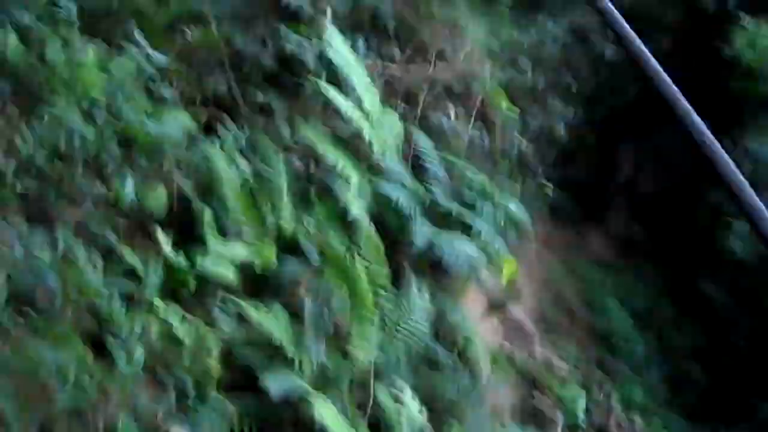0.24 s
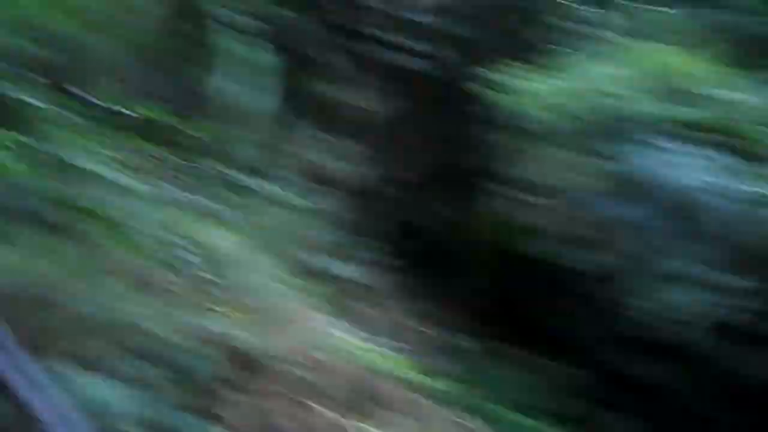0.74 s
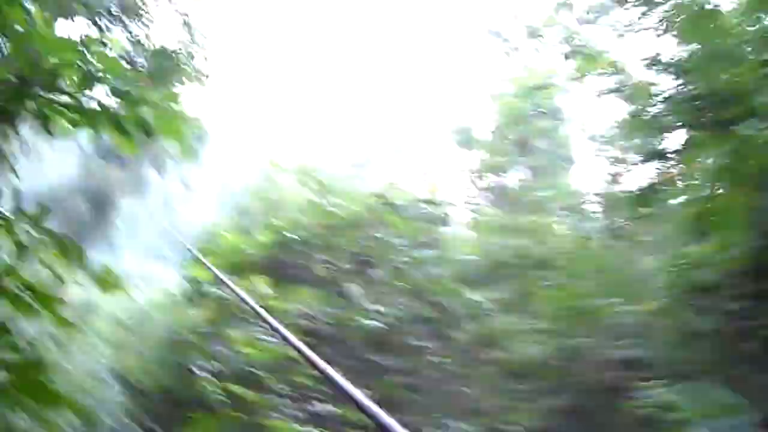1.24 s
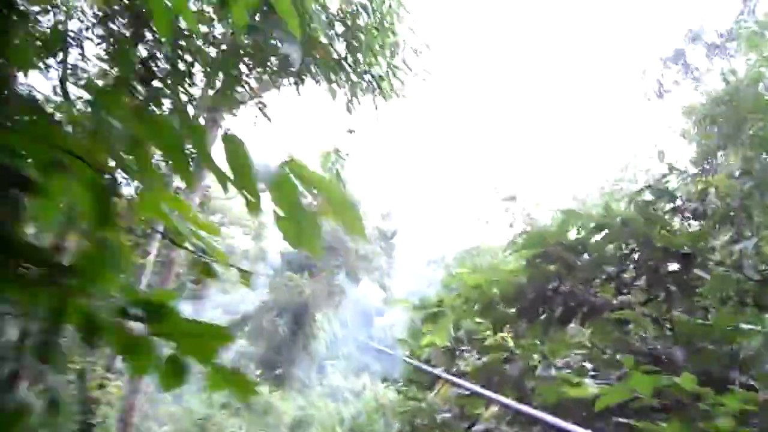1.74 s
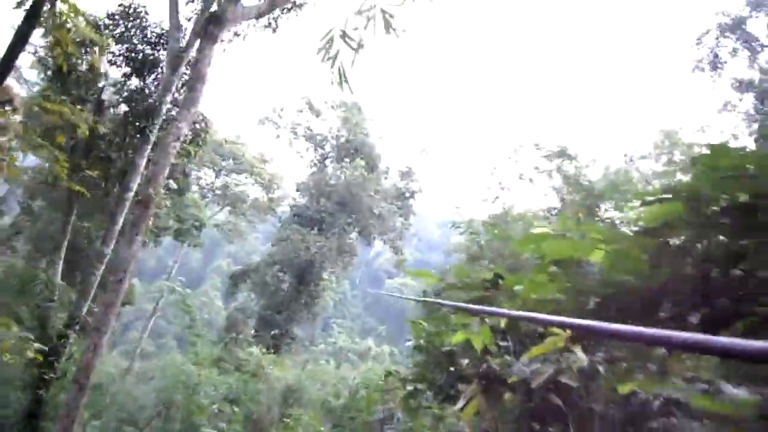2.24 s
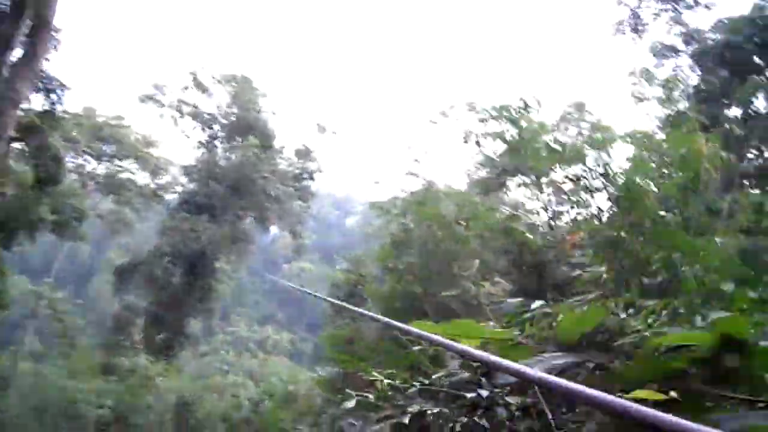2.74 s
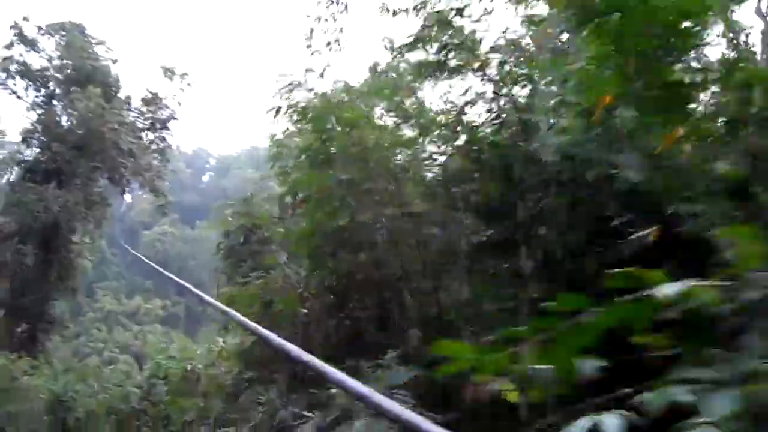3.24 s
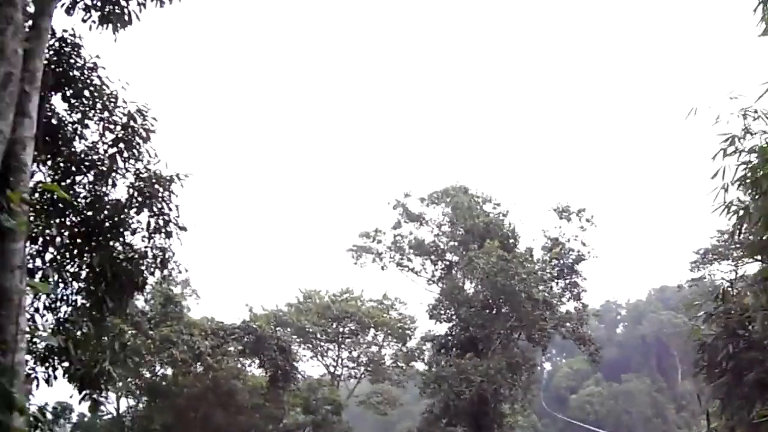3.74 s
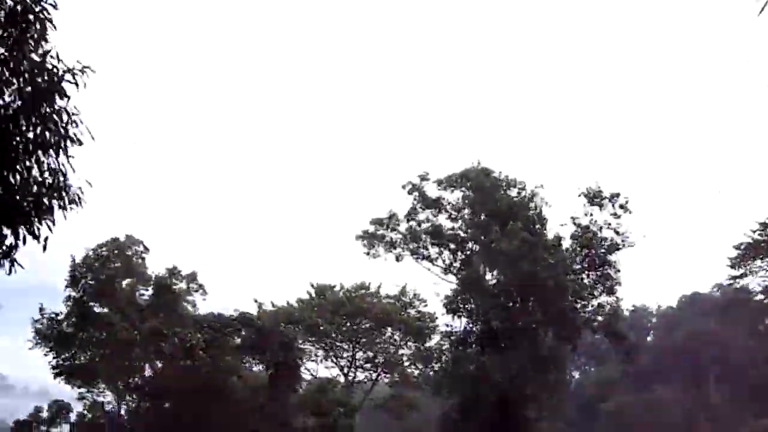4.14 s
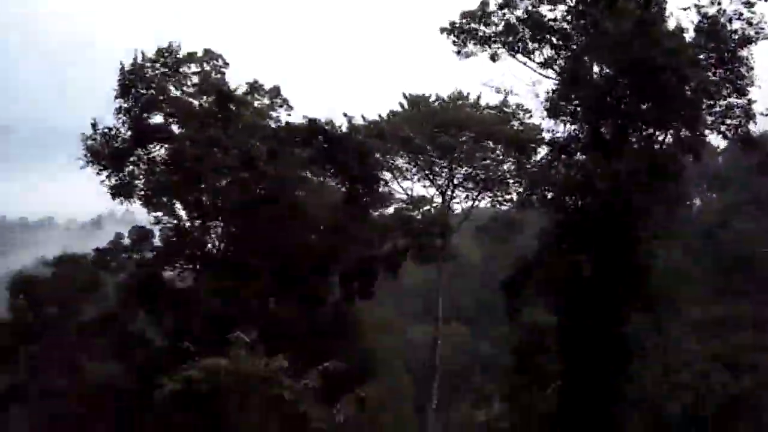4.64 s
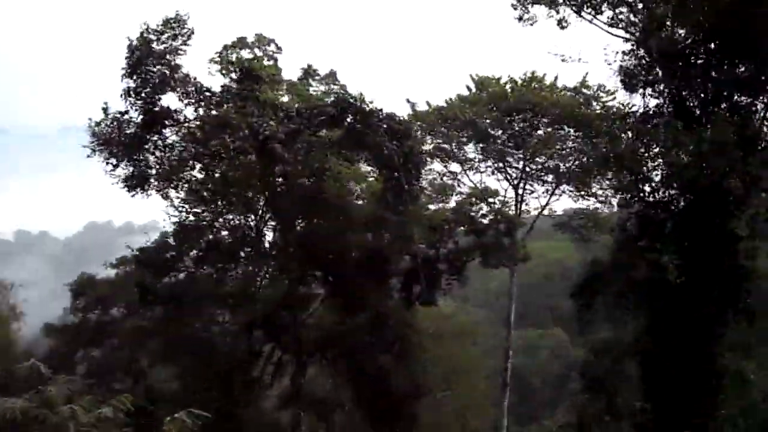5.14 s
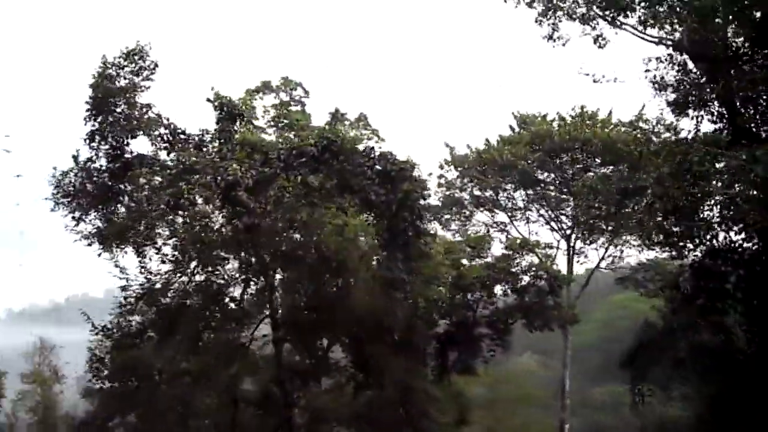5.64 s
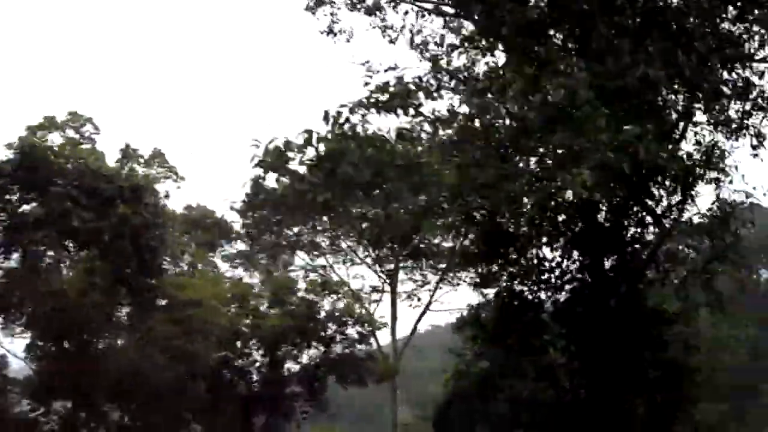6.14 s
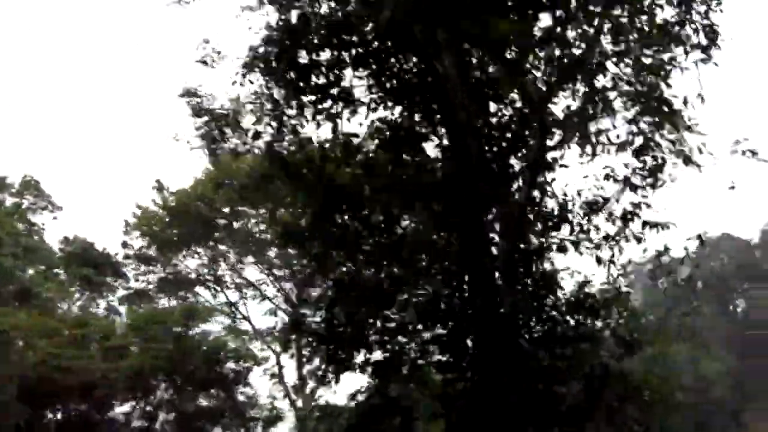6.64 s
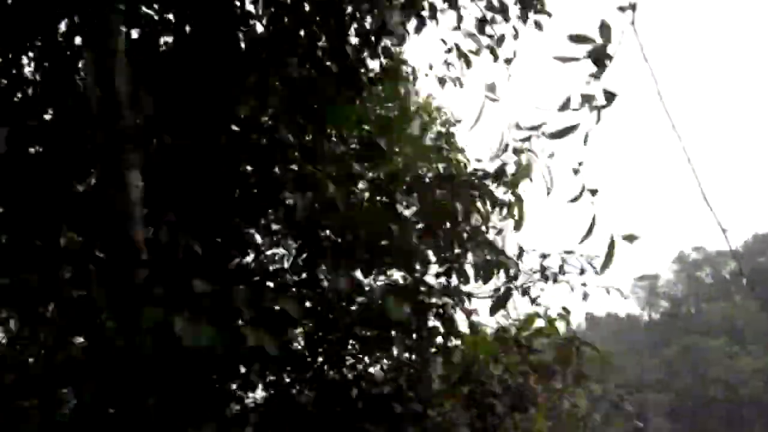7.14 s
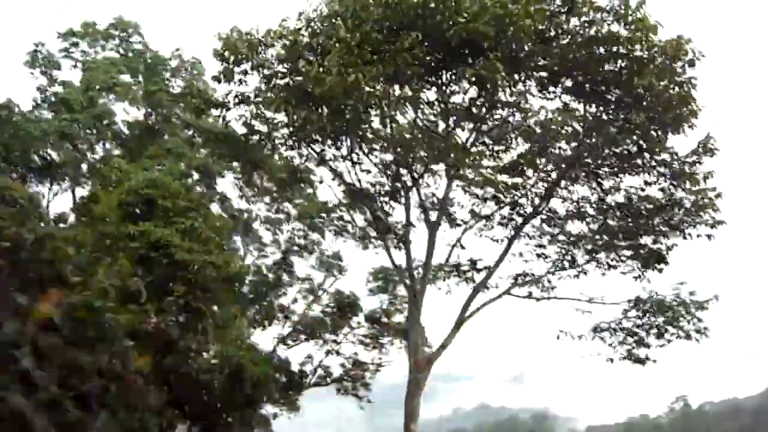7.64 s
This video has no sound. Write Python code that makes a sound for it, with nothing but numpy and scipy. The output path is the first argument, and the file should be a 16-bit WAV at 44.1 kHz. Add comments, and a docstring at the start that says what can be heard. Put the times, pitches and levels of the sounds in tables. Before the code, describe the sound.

A steady metallic whirring hiss from a zip line trolley builds and climbs in pitch, with wind rumble and one sharp slap near the end.

```python
"""Trolley on a steel cable.

Pulleys gather speed above a camera that turns in the rider's hand. Groove bumps repeat every turn,
strands whine 12 times a turn, grit hisses in the trolley's resonances. Gusts and a growing headwind
buffet each microphone port separately. Once something slaps the camera and the recorder clips."""
import sys
import numpy as np
from scipy import signal
from scipy.fft import rfft, irfft, next_fast_len
from scipy.io import wavfile
from scipy.ndimage import uniform_filter1d, map_coordinates

SR = 44100
rng = np.random.default_rng(int(sys.argv[2]) if len(sys.argv) > 2 else 0)


def store_pcm(level_fs):
    """Save levels as 16-bit WAV."""
    pcm = np.round(np.clip(level_fs, -1, 1) * 32767).astype(np.int16)
    wavfile.write(sys.argv[1], SR, np.atleast_2d(pcm).T)


N = 348390
TIME_S = np.arange(N) / SR
CRUISE_TURNS_PER_S = 70
SLAP_S, PUFF_S = 7.3795, 7.389
# Each row: time in s, pulley turns per s, strand whine in dB, share of power repeating each turn.
PULLEY_RUN = [(0, 32, -70, 0.1), (.9, 46, -60, 0.15), (1.0, 45, -47, 0), (1.2, 58, -42, 0.4),
              (1.5, 60, -46, 0.22), (2, 62, -40, 0.33), (2.4, 65.5, -48, 0.23), (3, 68, -52, 0.28),
              (3.7, 76, -49, 0.46), (4.2, 80, -48, 0.4), (4.6, 82, -58, 0.62), (5, 87.4, -45, 0.78),
              (5.5, 93, -45.5, 0.44), (6, 98, -43, 0.61), (6.5, 104, -40.5, 0.65), (7, 106, -36.5, 0.54),
              (7.5, 112, -37, 0.42), (7.9, 109.6, -48, 0.4)]


def amp(db):
    """dB to gain."""
    return 10 ** (np.asarray(db) / 20)


def unit(x):
    """Scale to rms 1."""
    return x / np.sqrt(np.mean(x ** 2) + 1e-20)


def along(points, at):
    """Interpolate (x, value) points on a log x axis."""
    x, value = np.transpose(points)
    return np.interp(np.log(at + 1e-3), np.log(x), value)


def curves(rows, t=TIME_S):
    """Each column after the time, read at times t."""
    times, *columns = np.transpose(rows)
    return [np.interp(t, times, column) for column in columns]


def wobble(knots_per_s):
    """Smooth random curve."""
    knots = rng.standard_normal(int(N * knots_per_s / SR) + 4)
    return map_coordinates(knots, [TIME_S * knots_per_s])


def swell(t, middle_s, half_s, steepness=2.27):
    """Rounded rise and fall, 1 at the middle."""
    return np.exp(-np.abs((t - middle_s) / half_s) ** steepness)


def filtered(x, response):
    """Apply a gain given as a function of Hz."""
    size = next_fast_len(N + 8192)
    return irfft(rfft(x, size) * response(np.fft.rfftfreq(size, 1 / SR)), size)[..., :N]


def resonance(hz, centre_hz, width_hz, db):
    """Power of a resonance applied twice, averaging db over frequency."""
    centre_hz = centre_hz + np.zeros_like(db)
    detuning = (hz ** 2 - centre_hz ** 2) / (hz + 1) / width_hz
    shape = 1 / (1 + detuning ** 2) ** 2
    return amp(db) ** 2 * shape / shape.mean(axis=0)


def headwind(cruise_db=-44, db_per_octave=13.5, top_hz=80):
    """Deep rumble that grows with speed, independent at each port."""
    speed_db = db_per_octave * np.log2(curves(PULLEY_RUN)[0] / CRUISE_TURNS_PER_S)
    deep = filtered(rng.standard_normal((2, N)), lambda hz: hz / (hz + 20) / (1 + (hz / top_hz) ** 3))
    return amp(cruise_db + speed_db + 1.2 * wobble(3.1)) * unit(deep)


def wind():
    """Eddies burst on each port: lumpy thud and roar, gusts over a steady breeze."""
    # Eddy spectra. Each row: frequency in Hz, relative level in dB.
    thud_spectrum = [(15, -18), (40, -14.5), (110, -2), (220, -2.5), (350, -7), (700, -19), (1500, -56)]
    roar_spectrum = [(100, -41), (250, -2.5), (450, 0), (750, -1), (1600, -11), (2500, -13), (5000, -52)]
    # Per port: thud in dB, roar in dB.
    breeze = {"L": (-41, -43.5), "R": (-35.5, -37.5)}
    # Each row: port, middle in s, half length in s, thud in dB, roar in dB.
    gusts = [("R", 0.089, 0.053, -24, -23.5), ("L", .21, 0.035, -34, -30.5), ("R", 0.23, 0.062, -43, -33),
             ("L", .33, 0.045, -40, -35.5), ("R", 0.443, 0.01, -25, -24), ("R", 0.512, 0.021, -17.5, -18.5),
             ("R", 0.554, 0.029, -20, -11.5), ("L", 0.67, .05, -37, -38), ("L", .77, 0.031, -34, -23.5),
             ("L", 0.825, .04, -31, -32), ("R", 0.907, 0.077, -35, -26), ("R", 2.086, 0.35, -25, -15.5),
             ("L", 2.3, 0.32, -37, -30.5), ("R", 2.33, 0.072, -20.5, -18), ("R", 2.55, 0.17, -23.5, -14),
             ("L", 2.77, .2, -37, -30.5), ("R", 3.16, 0.22, -25.5, -21), ("R", 3.43, 0.11, -30, -15.5),
             ("L", 3.43, 0.12, -35, -40), ("R", 3.94, 0.23, -21.5, -14), ("R", 4.15, 0.1, -30, -11.5),
             ("R", 4.363, 0.16, -21.5, -13), ("L", 4.65, 0.12, -39, -32), ("R", 4.66, 0.11, -24.5, -25.5),
             ("R", 4.9, 0.13, -28, -24.5), ("R", 6.08, 0.32, -28.5, -40), ("L", 6.13, .2, -29.5, -36),
             ("L", 6.68, 0.31, -26, -39), ("R", 6.72, .35, -24.5, -36), ("L", 7.35, .12, -30, -38),
             ("R", 7.45, .15, -23.5, -34), ("L", 7.8, .25, -28.5, -37), ("R", 7.8, 0.2, -20.5, -29.5)]
    ports = []
    for port, steady_db in breeze.items():
        gust_power = sum(amp([[thud_db], [roar_db]]) ** 2 * swell(TIME_S, middle_s, half_s)
                         for side, middle_s, half_s, thud_db, roar_db in gusts if side == port)
        power = amp(steady_db)[:, None] ** 2 + gust_power
        lumps = 0.7 * wobble(24) + 1.74 * wobble(80)
        layers = []
        for spectrum, depth_db in ((thud_spectrum, .7), (roar_spectrum, 1.2)):
            eddies = filtered(rng.standard_normal(N), lambda hz: amp(along(spectrum, hz)))
            layers.append(unit(amp(lumps * depth_db) * eddies))
        ports.append(np.sum(np.sqrt(power) * layers, axis=0))
    return np.array(ports)


def slap(left_db=3, right_db=2, length_s=.005, puff_db=-4, puff_hz=150):
    """A broad crack on the camera, then one low swing of air on the left port."""
    age = (TIME_S - SLAP_S) / length_s
    envelope = (age > 0) * np.exp(-np.clip(age, 0, 9) ** 3)
    crack = filtered(rng.standard_normal((2, N)), lambda hz: 1 / (1 + (hz / 7000) ** 2))
    ports = unit(crack) * envelope * amp([[left_db], [right_db]])
    cycle = (TIME_S - PUFF_S) * puff_hz
    ports[0] -= amp(puff_db) * np.sin(2 * np.pi * cycle) * (cycle > 0) * (cycle < 1)
    return ports


def strand_whine(turns_per_s, db, strands_per_turn=12):
    """Cable strands pass under the pulley: a fluttering tone."""
    phase = 2 * np.pi * strands_per_turn * np.cumsum(turns_per_s) / SR
    return amp(db) * (wobble(25) * np.sin(phase) + wobble(25) * np.cos(phase))


def howl_and_squeals(hz, t, howl_width_hz=117):
    """Power spectrum of a narrow howl that climbs as speed grows, and of brief wheel squeals."""
    # Each row: time in s, pitch in Hz, dB over the rolling level.
    howl = [(1.12, 1256, -50), (1.16, 1280, -17), (1.35, 1420, -17.5), (1.5, 1578, -11.5),
            (1.7, 1460, -12.5), (2, 1590, -19), (2.25, 1790, -13.5), (2.5, 1905, -25), (2.75, 2100, -11.5),
            (3.2, 2096, -11), (3.45, 2500, -18), (3.65, 2404, -15), (3.76, 2320, -6), (4.3, 2408, -9),
            (4.7, 2464, -3.5), (5, 2545, -1), (5.3, 2490, -10.5), (5.5, 2546, -19), (5.6, 2832, -6.5),
            (6, 2640, -5), (6.3, 2540, -13), (7.9, 2500, -23)]
    # Each row: middle in s, half length in s, pitch in Hz, glide in Hz/s, width in Hz, dB over rolling.
    squeals = [(0.155, 0.077, 3400, 300, 300, 1.5), (.21, .05, 4950, 100, 500, -5),
               (0.446, .12, 2380, 300, 300, -9), (0.99, 0.12, 3750, 2700, 800, -3.5),
               (2.95, .3, 3720, 100, 350, -11), (4.1, 0.37, 3380, 150, 200, -8.5),
               (7.2, 0.32, 3130, 100, 199.9, -14)]
    howl_hz, howl_db = curves(howl, t)
    power = resonance(hz, howl_hz, howl_width_hz, howl_db)
    for middle_s, half_s, centre_hz, glide_hz_per_s, width_hz, db in squeals:
        pitch_hz = centre_hz + glide_hz_per_s * np.clip(t - middle_s, -half_s, half_s)
        power += resonance(hz, pitch_hz, width_hz, db) * swell(t, middle_s, half_s)
    return power


def side_plates(hz, t, turns_per_s, pan_db, low_hz=1574):
    """Power spectrum of the plates' three rings at one port: middle, upper, low."""
    # Each row: time in s, middle ring in Hz, then middle, upper and low ring in dB over rolling.
    rings = [(0, 2510, -6, -7, -19), (.15, 2400, -8.5, -10, -26), (.3, 2350, -4, -7.5, -27),
             (.6, 2670, -5.5, -7.5, -18), (.9, 2400, -11, -7.5, -11.5), (1.5, 2500, -9, -5.5, -20),
             (1.8, 2650, -6, -2.5, -15), (2.1, 2730, -4.5, -4, -13.5), (2.4, 2655, -5.5, -5, -13),
             (2.7, 2530, -3.5, -2, -16), (3.1, 2270, -7.5, -4, -23), (3.6, 2410, -5.5, -11.5, -30),
             (3.9, 2370, -7.5, -7, -23), (4.5, 2418, -3, -7, -27), (4.8, 2503, -9.5, -16, -37),
             (5.1, 2540, -8.5, -29, -27), (5.4, 2620, -9, -13, -24.5), (5.7, 2790, -9.5, -22, -25.5),
             (6, 2690, -2.5, -14, -24), (6.3, 2735, -6, -9.5, -19), (6.9, 2603, -6.5, -12, -17),
             (7.2, 2527, -15, -6.5, -17), (7.5, 2656, -7, -14, -20), (7.9, 2600, -8.5, -12, -22)]
    # Each row: turns per s, upper ring in Hz.
    upper_ring = [(84, 3332), (95, 2910)]
    # Per ring: width in Hz; weight of the pan.
    widths_hz = [900, 750, 870]
    pan_weights = [0.61, 1.4, .1]
    middle_hz, *levels_db = curves(rings, t)
    centres_hz = [middle_hz, along(upper_ring, turns_per_s), low_hz]
    return sum(resonance(hz, centre_hz, width_hz, db) * amp(weight * pan_db)
               for centre_hz, width_hz, db, weight in zip(centres_hz, widths_hz, levels_db, pan_weights))


def treble_rings(hz, t, turns_per_s, swings_db, port):
    """Power spectrum of the treble at one port: shifts with speed and camera angle, flares at jolts."""
    # Each row: centre in Hz, width in Hz.
    rings = [(4250, 1350), (5600, 2270), (7800, 2010), (10000, 1350)]
    # Per port, a row per ring: dB over rolling at cruise, dB per octave of speed, weights of 3 swings.
    pickup = [
        [(-13, 0.3, .01, 0.98, 0.029), (-10.5, 6.5, 0.24, -0.14, .05), (-17, 2, 0.85, -0.0067, -0.08),
         (-26, -5.5, 0.74, -0.056, 0.25)],
        [(-9, -1.5, -0.023, 0.12, .01), (-7, -1.5, -0.065, -0.21, 0.17), (-8.5, 7, -0.23, 0.29, 0.025),
         (-20, 1.5, -0.088, .01, 0.96)],
    ]
    # Each row: start in s, flare strength in dB.
    jolts = [(0, 6), (.755, 10.5), (.87, 2.5), (1.09, 3)]
    # Narrow steel ring. Each row: time in s, left and right in dB over rolling.
    sizzle = [(0, -25, -25), (1.2, -24, -18), (2, -15, -18), (2.8, -17, -15), (3.4, -12, -3),
              (3.7, -21, -11), (4.6, -14, -25), (4.9, -25, -28), (5.4, -24, -30), (5.65, -6, -19),
              (6.1, -12, -19), (6.8, -18, -19), (7.1, -18, -11), (7.9, -17, -17)]
    rise_s, fade_s = 0.0094, 0.055
    flare_db = sum(db * np.exp(-np.abs(t - start_s) / fade_s) * np.clip((t - start_s) / rise_s, 0, 1)
                   for start_s, db in jolts)
    octaves = np.log2(turns_per_s / CRUISE_TURNS_PER_S)
    levels_db = np.array(pickup[port]) @ [np.ones_like(t), octaves, *swings_db] + flare_db
    power = sum(resonance(hz, *ring, db) for ring, db in zip(rings, levels_db))
    power += resonance(hz, centre_hz=12800, width_hz=2500, db=levels_db[-1] - 6)
    return power + resonance(hz, centre_hz=5440, width_hz=500, db=curves(sizzle, t)[port])


def contact(turns_per_s, bumps=128, drift_per_s=7, grit_db=1.5):
    """Pulley-on-cable forces: groove bumps that return each turn, and two streams of random grit."""
    angle_turns = np.cumsum(turns_per_s) / SR % 1
    groove = rng.standard_normal((int(N * drift_per_s / SR) + 4, bumps))
    # The wheel wanders on the strands, so the pattern drifts.
    repeat = map_coordinates(groove, [TIME_S * drift_per_s, angle_turns * bumps], mode="grid-wrap")
    repeat = unit(repeat) * np.sqrt(bumps * turns_per_s / SR)  # same strength per Hz as the grit
    grit = unit(rng.standard_normal((2, N)) * amp(grit_db * wobble(400) + 0.6 * wobble(70)))
    return np.array([repeat, *grit])


def trolley(frame_samples=512, groove_harmonic=29, groove_width_hz=600):
    """Contact forces ring plates and sheaves; each port hears them at its own level and phase."""
    # Each row: time in s, rolling level in dB.
    rolling = [(0, -17.5), (.06, -23.5), (.12, -27), (.2, -21.5), (.3, -24.5), (.4, -22), (.5, -21),
               (.73, -21.5), (.78, -17.5), (1.05, -17.5), (1.12, -10), (1.3, -12), (1.6, -8.5),
               (1.8, -12.5), (2.1, -8.5), (2.4, -11), (2.7, -10.5), (3, -10.5), (3.2, -8.5), (3.5, -9),
               (3.65, -11.5), (3.8, -9.5), (4.1, -12), (4.8, -10), (5, -14.5), (5.2, -11), (5.42, -13),
               (5.65, -10.5), (6, -10.5), (6.1, -13), (6.4, -13), (6.5, -13), (6.65, -14), (6.8, -13),
               (7, -15), (7.1, -11.5), (7.2, -12.5), (7.4, -12), (7.6, -13.5), (7.7, -12), (7.8, -12),
               (7.9, -9.5)]
    # Each row: time in s, Hz near which the ports' phase flips, pan to the left in dB,
    # then swings in dB of the left high treble, left low treble and right top treble.
    camera_turn = [(0, 6200, -4, -5, -11, -15), (.2, 6050, -3, -5, -1, -12), (.55, 5700, -5.5, -4, 0, -3),
                   (.9, 5760, -2.5, -1, -5, 4.5), (1.2, 5750, -1, -4, 1, 3.5), (1.6, 5140, -1, 3, -3, 8),
                   (2.1, 4450, -2.5, 3.5, -6, 8.5), (2.7, 5000, -1.7, 3.5, -12, 8),
                   (3.3, 4900, -.5, 3, -3, 11), (3.6, 4650, 0, 7, -6, 7), (3.9, 4600, -.9, 3.5, -12, -8),
                   (4.3, 4496, -.5, 8, -13, 1), (4.6, 4630, -1.5, 2, -5, -9), (5, 5470, -6, 8.5, 8.5, -4),
                   (5.4, 4800, -0.5, 8.5, 11, -16), (5.7, 4380, -3, 9, 10.5, 2), (6, 4050, -5, 0, 4.5, 3),
                   (6.3, 3795, -9.5, -12, -2, 4), (6.6, 3905, -12.5, -14, 2, 8),
                   (6.9, 3900, -12.5, -23, -4, -8), (7.2, 3950, -4, -6, 8, -11),
                   (7.5, 3700, -4.5, -13, 1.5, 3), (7.9, 3700, 0, -2, 11.5, -5)]
    # Each row: multiple of the flip frequency, left phase lead in radians.
    phase_lead = [(.4, -0.65), (.75, -.15), (.9, -0.5), (1.1, -3), (1.6, -4.5), (2.2, -4.5), (3, -9.5)]
    # Each row: frequency in Hz, left-right coherence.
    coherence = [(1200, .97), (3000, .99), (4500, .8), (6500, .85), (9000, .6), (13000, .35)]
    turns_per_s, whine_db, _ = curves(PULLEY_RUN)
    turns_per_s *= 1 + .003 * wobble(9)
    hz, t, (repeat, grit, scattered) = signal.stft(contact(turns_per_s), SR, nperseg=frame_samples)
    hz = hz[:, None]
    speed, _, share = curves(PULLEY_RUN, t)
    groove_band = np.exp(-((hz - groove_harmonic * speed) / groove_width_hz) ** 4)
    share = np.clip(share, 0, 1) * groove_band
    direct = np.sqrt(share) * repeat + np.sqrt(1 - share) * grit
    patches = uniform_filter1d(uniform_filter1d(rng.standard_normal(direct.shape), 5, 0), 10, 1)
    flicker = amp((0.78 + 0.99 * hz / 10000) * unit(patches))  # deeper in the treble
    flip_hz, pan_db, *swings_db = curves(camera_turn, t)
    spread_rad = np.arccos(along(coherence, hz)) / 2
    lead_rad = along(phase_lead, hz / flip_hz)
    howl = howl_and_squeals(hz, t)
    ports = np.zeros((2, N))
    for port, sign in enumerate((1, -1)):
        power = howl * amp(sign * pan_db) + side_plates(hz, t, speed, sign * pan_db)
        power += treble_rings(hz, t, speed, swings_db, port)
        force = np.cos(spread_rad) * direct + sign * np.sin(spread_rad) * scattered
        spectrum = force * np.exp(.5j * sign * lead_rad) * np.sqrt(power) * flicker
        ports[port] = signal.istft(spectrum, SR, nperseg=frame_samples)[1][:N]
    since_s = TIME_S - PUFF_S
    ports[0] *= amp(7.8 * np.exp(-np.abs(since_s) / 0.058) * (since_s > 0))  # louder just after the slap
    return ports * amp(curves(rolling)[0] + 0.13 * wobble(18)) + strand_whine(turns_per_s, whine_db)


def scene():
    """All sources at the left and right port."""
    return trolley() + wind() + slap() + headwind()


def record(dry, knee=12, top_hz=14300):
    """Soft clip of the loudest peaks, then a band limit."""
    clipped = dry / (1 + np.abs(dry) ** knee) ** (1 / knee)
    return np.clip(filtered(clipped, lambda hz: hz < top_hz), -1, 1)


dry = scene()
out = record(dry)
store_pcm(out)
```